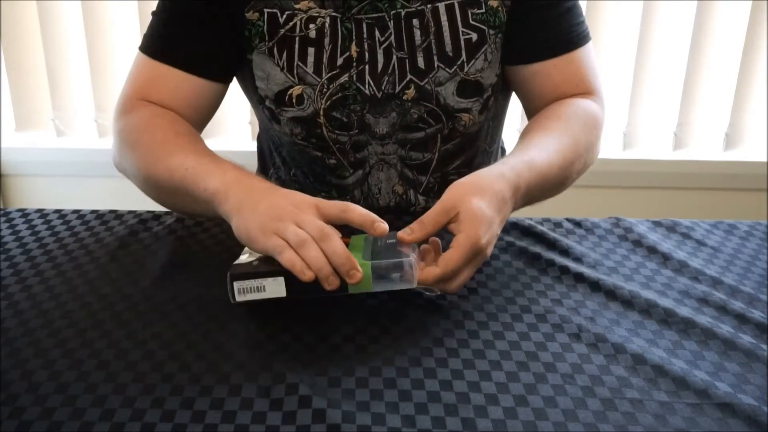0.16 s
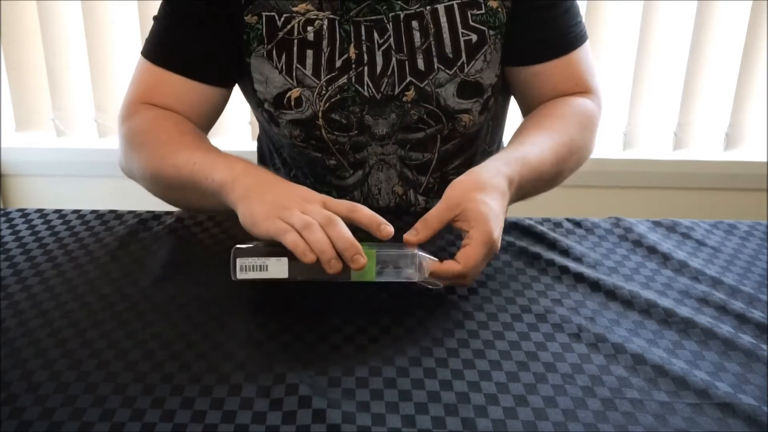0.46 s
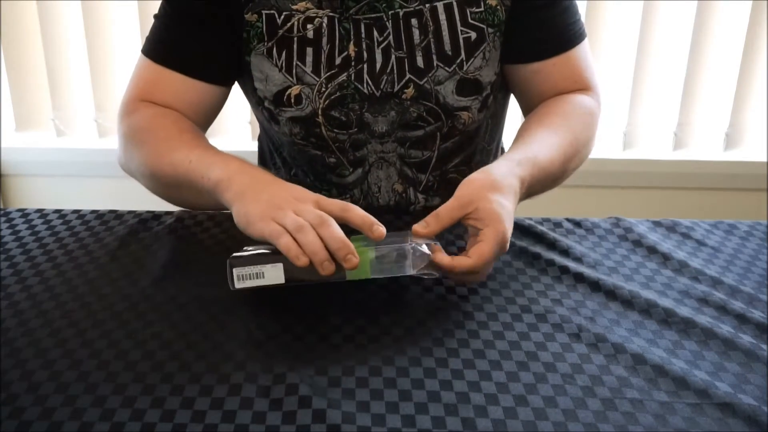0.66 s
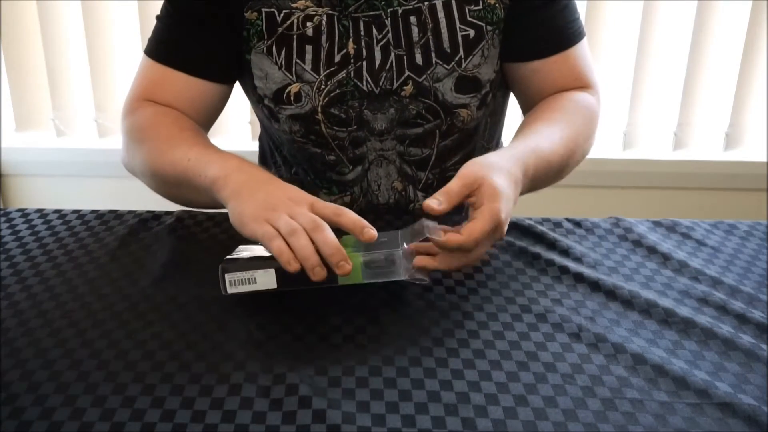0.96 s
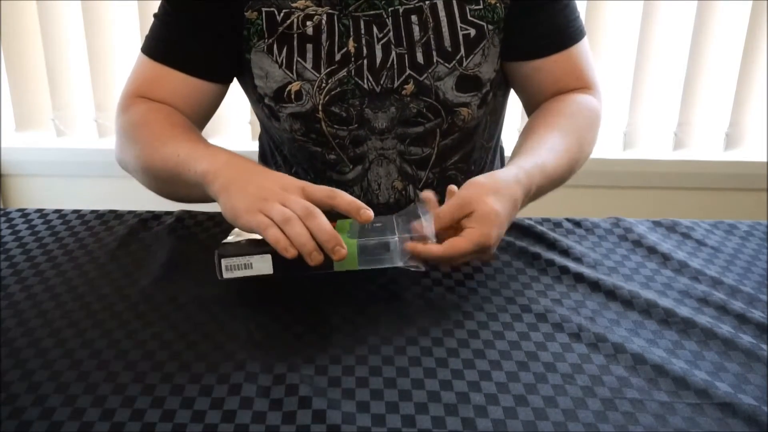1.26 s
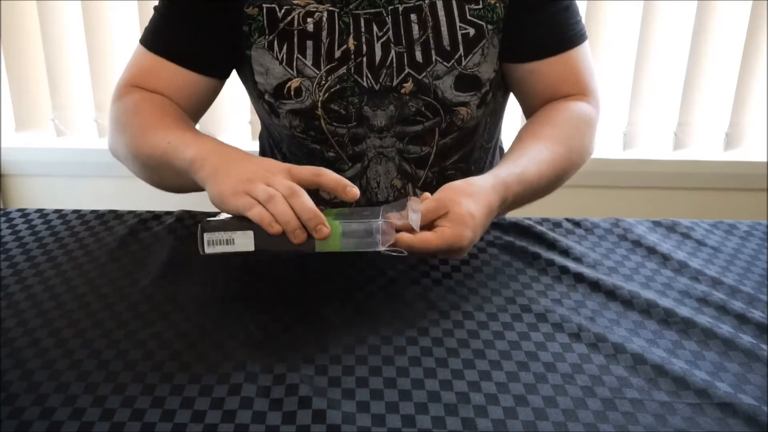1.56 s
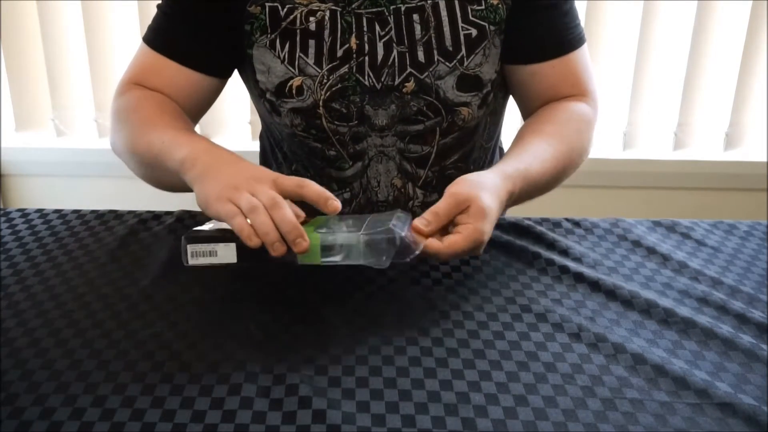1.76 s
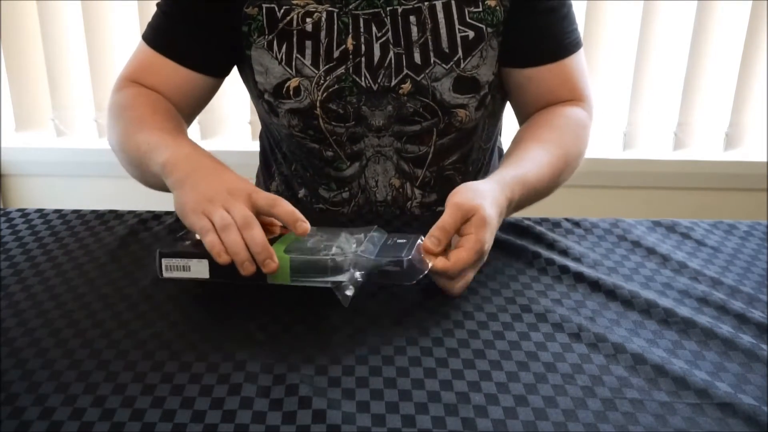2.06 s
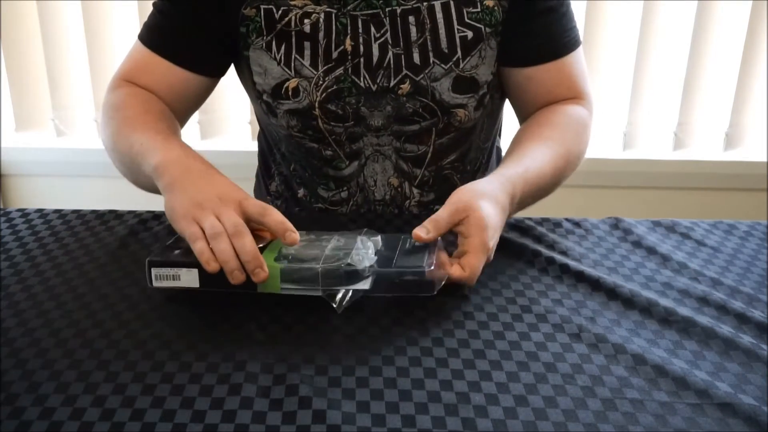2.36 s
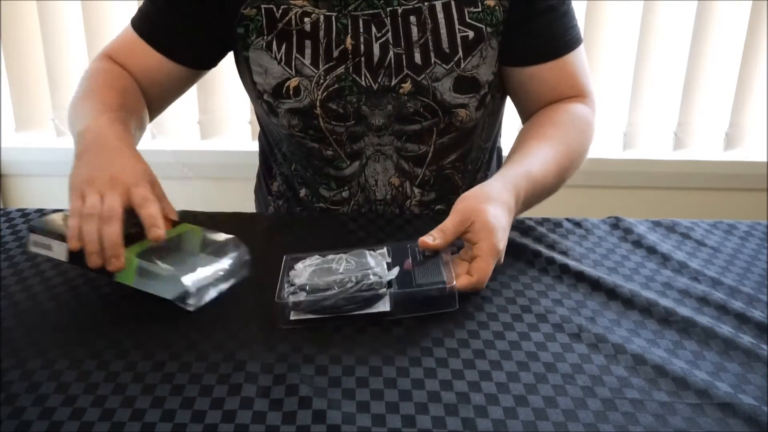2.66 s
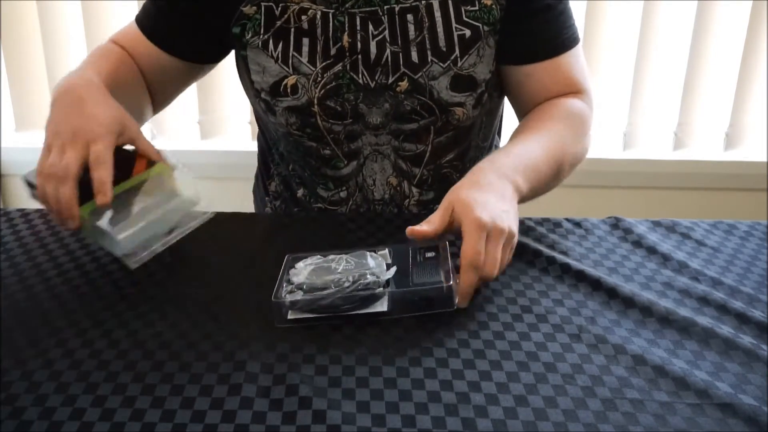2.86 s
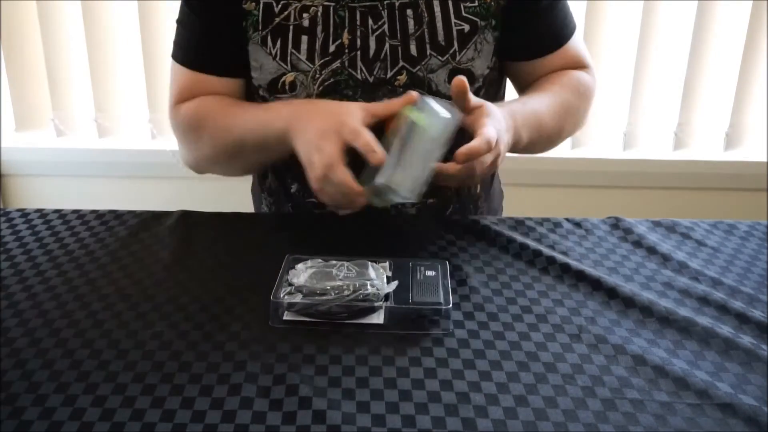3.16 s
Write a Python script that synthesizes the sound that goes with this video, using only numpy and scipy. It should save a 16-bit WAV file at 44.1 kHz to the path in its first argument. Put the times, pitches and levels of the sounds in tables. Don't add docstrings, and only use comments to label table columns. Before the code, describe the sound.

Stiff plastic and card packaging is opened close by: a loud hollow pop and brief rubbing at 0.1 s, crisp snaps around 0.4 and 0.6 s, sparser pops near 1.0, 1.2 to 1.5 and 1.6 s. A crackle cluster at 1.8 s leads to denser, fizzing scrapes at 2.05 to 2.4 and 2.6 to 2.95 s, then a dull cloth-muffled bump at 3.2 s. The lively room echoes over quiet hush.

```python
import sys
import numpy as np
from scipy import signal
from scipy.fft import rfft, irfft
from scipy.io import wavfile
from scipy.ndimage import uniform_filter1d

SR = 44100
rng = np.random.default_rng(int(sys.argv[2]) if len(sys.argv) > 2 else 0)


def master(y):
    cut = np.clip(np.atleast_2d(y).T, -1, 1)
    pcm = np.round(cut * 32767)
    wavfile.write(sys.argv[1], SR, pcm.astype(np.int16))


def natural_amplitude(level_db):
    exponent = np.asarray(level_db, float) / 20
    return 10 ** exponent


N = 145530


def evened(x):
    return x / np.sqrt(np.mean(x ** 2) + 1e-20)


def peaked(x):
    return x / (abs(x).max() + 1e-20)


def read(points, hz):
    f, value = np.transpose(points)
    return np.interp(np.log(hz + 1), np.log(f + 1), value)


def colour(x, points):
    gain = natural_amplitude(read(points, np.fft.rfftfreq(x.shape[-1], 1 / SR)))
    return irfft(rfft(x) * gain, x.shape[-1])


def thin(x, hz):
    return signal.sosfilt(signal.butter(2, hz, "high", fs=SR, output="sos"), x)


def ring(x, hz, width):
    b, a = signal.iirpeak(min(hz, 18000.), max(hz / width, .3), SR)
    return signal.lfilter(b, a, x)


def add(mix, s, sound):
    part = mix[round(s * SR):][:len(sound)]
    part += sound[:len(part)]


def burst(shape):
    x = rng.standard_normal(len(shape)) * shape
    for _ in range(6):
        z = rfft(x)
        x = irfft(z / (abs(z) + 1e-9), len(x))
        x = x * shape / np.sqrt(abs(uniform_filter1d(x ** 2, size=15)) + 1e-12)
    return x


def slips():
    slips_per_s, spread_db, slip_s = 750, 2.5, 0.0015
    chance, size, noise = rng.random((16384, 3)).T
    sizes = (chance < slips_per_s / SR) * natural_amplitude(-spread_db * np.log(size + 0.1))
    fading = signal.lfilter([1], [1, -np.exp(-1 / (slip_s * SR))], sizes)
    return (noise - .5) * (0.15 + fading)


def stroke(x, length, peak):
    u = np.linspace(0, 1, round(length * SR))
    return x[:len(u)] * np.sin(np.pi * u ** peak) ** 2


def pair(frames, size, gain):
    # (f/Hz, likeness from 0 to 1)
    likeness = [(100, 0.83), (500, 0.98), (1000, 0.72), (2000, 0.6), (4000, 0.013), (12000, 0.022)]
    hz = np.fft.rfftfreq(size, 1 / SR)[:, None]
    t = np.arange(frames) * size / 4 / SR
    a, b, c, d = rng.standard_normal((frames, len(hz), 4)).T
    same = np.clip(read(likeness, hz), 0, 1)
    mid = (a + 1j * b) * np.sqrt(1 + same)
    side = (c + 1j * d) * np.sqrt(1 - same)
    spectra = np.array([mid + side, mid - side]) * gain(hz, t)
    return signal.istft(spectra, nperseg=size, noverlap=size * 3 // 4)[1]


def hush():
    # (f/Hz, level/dB)
    hush_colour = [(25, -11), (60, -17.5), (200, -14), (1000, -11), (4000, -21.5), (16000, -27.5)]
    noise = pair(frames=N // 512 + 5, size=2048, gain=lambda hz, t: natural_amplitude(read(hush_colour, hz) + 0 * t))
    return natural_amplitude(-44) * evened(noise[:, :N])


def room(x):
    # (f/Hz, time/s)
    die_away = [(60, 0.13), (300, 0.53), (900, 0.61), (2500, 0.6), (6000, 0.47), (15000, 0.28)]
    # (f/Hz, level/dB)
    echo_colour = [(60, -74), (200, 11.5), (800, 6.5), (4000, 6), (15000, 4)]
    gap_s, rise_s = .003, .003
    out = np.zeros((2, N))
    turn = np.arange(N) / SR * 2 * np.pi * 1.31
    for k in range(3):
        tail = pair(frames=600, size=256,
                    gain=lambda hz, t: natural_amplitude(read(echo_colour, hz) - 60 * t / read(die_away, hz)))
        t = np.arange(tail.shape[1]) / SR
        tail = tail * np.clip((t - gap_s) / rise_s, 0, 1)
        fed = x * np.sqrt(2 / 3) * np.cos(turn + k * np.pi / 3)
        out += signal.fftconvolve(fed[None], tail / np.linalg.norm(tail[0]), axes=1)[:, :N]
    return natural_amplitude(3) * out


def knocks():
    # (t/s, level/dB, f/Hz)
    bumps = [(0.123, -44, 70), (0.616, -23, 380), (.64, -49, 50.4), (1.211, -36, 450), (1.31, -27.5, 211),
             (1.496, -29.5, 294), (1.813, -34.5, 188), (2.07, -28.5, 260), (2.476, -35.5, 108),
             (2.599, -35.5, 105), (2.659, -37.5, 118), (2.961, -34.5, 103), (2.964, -25.5, 353),
             (3.02, -38, 35.6), (3.214, -23, 420), (3.223, -28, 179), (3.253, -30, 420)]
    cycles = 2.37
    out, t = np.zeros(N), np.arange(8192) / SR
    for s, db, hz in bumps:
        u = t * hz / cycles
        push = u * np.exp(-5 * u) * np.sin(2 * np.pi * hz * t)
        add(out, s, natural_amplitude(db) * peaked(push))
    return out


def hums():
    # (start t/s, length/s, level/dB, f/Hz)
    singing = [(0.127, 0.13, -20.5, 1164), (0.131, 0.13, -25, 573), (.13, 0.18, -30.5, 2340),
               (0.426, 0.058, -35, 851), (0.626, 0.23, -40.5, 410), (.62, 0.081, -37, 2420),
               (.999, 0.049, -31, 2676), (1.0, 0.05, -30, 1900), (1.215, 0.081, -35, 548),
               (1.202, 0.036, -29, 1350), (1.499, 0.071, -34.5, 2150), (1.82, 0.12, -36, 540),
               (2.07, 0.36, -34, 942), (2.6, 0.34, -30.5, 843), (2.68, .16, -27, 1310),
               (2.702, 0.2, -34.5, 2840), (2.7, 0.113, -34.5, 485), (2.909, 0.017, -31, 2120),
               (2.962, 0.015, -26.5, 2030)]
    width = 0.084
    out = np.zeros(N)
    for s, length, db, hz in singing:
        tone = ring(ring(slips(), hz, width * hz), hz, 2 * width * hz)
        tone = natural_amplitude(db) * evened(tone[:round(length * SR)])
        add(out, s, stroke(tone, length, peak=.4))
    return out


def rub():
    # (start t/s, length/s, hollow level/dB, fizz level/dB, hollow f/Hz)
    strokes = [(0.015, 0.042, -36.5, -37, 850), (0.134, 0.097, -25.5, -32, 605),
               (0.133, 0.13, -21.5, -53, 744), (.42, 0.024, -35, -55, 890), (0.617, 0.21, -32, -25, 2470),
               (0.125, 0.12, -28.5, -45, 3900), (2.075, 0.25, -31, -37, 490),
               (1.297, 0.057, -29.5, -62, 422), (0.902, 0.044, -42, -41, 920),
               (1.308, 0.16, -41, -82, 1650), (1.603, 0.11, -38.5, -29, 880),
               (1.703, 0.15, -38.5, -29, 2260), (1.776, 0.07, -26, -24.5, 780),
               (1.782, 0.091, -28, -51, 2450), (2.064, 0.1, -24.5, -26, 1050),
               (2.064, 0.26, -31, -24, 2150), (2.092, 0.22, -24, -23, 3600), (2.402, 0.3, -39, -28.5, 546),
               (2.444, 0.34, -33, -28.5, 1510), (2.583, 0.11, -27.5, -21.5, 720),
               (2.66, 0.28, -28, -25, 1420), (2.685, 0.31, -32.5, -60, 760),
               (2.91, 0.019, -21.5, -23, 1530), (2.051, 0.013, -28, -53, 2460),
               (2.954, 0.03, -29, -31.5, 2080), (3.211, 0.052, -33.5, -60, 750)]
    # (f/Hz, level/dB)
    fizz_colour = [(500, -61), (1500, -49), (3000, 31.5), (6000, 29), (11000, 31.5), (16000, 31.5)]
    hollow_width, ring_width, ring_share = 0.82, 0.084, 0.39
    out = np.zeros(N)
    for s, length, hollow_db, fizz_db, hz in strokes:
        grains = slips()
        hollow = ring(ring(grains, hz, hollow_width * hz), hz, 2 * hollow_width * hz)
        hollow = evened(hollow) + ring_share * evened(ring(grains, hz, ring_width * hz))
        fizz = evened(colour(grains, fizz_colour))
        both = natural_amplitude(hollow_db) * evened(hollow) + natural_amplitude(fizz_db) * fizz
        add(out, s, stroke(both, length, peak=0.48))
    return out


def cracks():
    # (t/s, level/dB, f/Hz, build-up/s)
    creases = [(0.0262, -24.5, 4500, 0.00068), (0.1257, -9, 3230, 0.00077), (.165, -28, 4800, 0.00046),
               (0.179, -9, 13100, 0.0011), (0.2083, -7.5, 4260, 0.0012), (.362, -26, 9050, 0.00073),
               (0.416, -26, 8900, 0.00085), (0.422, -2.5, 10300, 0.00082), (0.564, -12.5, 10800, 0.00055),
               (.572, -19, 10600, 0.0015), (0.589, -20.5, 6200, 0.0034), (.614, -4.5, 5300, .0006),
               (.637, -9, 5100, .002), (0.6439, -0.5, 9700, 0.00089), (1.0046, -14, 7470, 0.0023),
               (1.239, -27, 5960, 0.00082), (1.302, -24, 5070, .001), (1.3068, -15, 10500, 0.00093),
               (1.3524, -18.5, 4550, 0.0022), (1.361, -21.5, 9450, 0.0012), (1.4128, -23, 10500, .0012),
               (1.599, -6.5, 12500, 0.0011), (1.608, -28, 11600, 0.0027), (1.7783, -13, 3530, 0.00041),
               (1.8014, -10, 5970, 0.002), (1.8198, -3.5, 3540, 0.00057), (1.8381, -4.5, 5530, 0.00089),
               (1.839, -3, 12000, 0.0011), (2.0572, -10, 8600, 0.00065), (2.065, -12, 13100, 0.00058),
               (2.107, -8, 10900, 0.0011), (2.1113, -6, 13000, .0006), (2.12, -3, 12200, 0.001),
               (2.133, -3, 12600, 0.00125), (2.146, -8, 13400, .001), (2.1599, -7.5, 3760, .0006),
               (2.3811, -7, 11100, 0.0008), (2.605, -11, 11500, 0.0016), (2.6403, -1.5, 13800, 0.0022),
               (2.6431, -6, 3360, 0.00097), (2.669, -10, 12500, .0012), (2.675, 1, 10400, 0.0002),
               (2.683, -17, 7100, 0.00033), (2.8537, -6.5, 5440, 0.00067), (2.855, -8.5, 3040, 0.00088),
               (2.9132, -13.5, 4940, 0.0014), (3.221, -31.5, 4790, 0.00098)]
    width, tail, spread_db = 0.56, 1.86, -5
    out, t = np.zeros(N), np.arange(1024) / SR
    for s, db, hz, build in creases:
        u = t / max(build, .0002)
        snap = burst(np.minimum(u, 1) * np.exp(-u / tail))
        bright = ring(ring(snap, hz, width * hz), hz, 2 * width * hz)
        wide = natural_amplitude(spread_db) * peaked(thin(snap, 3000))
        add(out, s, natural_amplitude(db) * peaked(wide + peaked(bright)))
    return out


def pops():
    # (t/s, level/dB, panel f/Hz, tick level/dB, shudder length/s)
    flips = [(0.0093, -12.5, 895, -16, 0.0007), (0.031, -25, 880, -15, 0.00071),
             (0.123, 1, 760, -21, 0.0021), (0.278, -16, 720, -13, 0.00092),
             (0.322, -23.5, 1060, 4, 0.00067), (0.361, -19.5, 1040, 2, 0.0014),
             (0.394, -17.5, 1060, -31, 0.0008), (0.42, -13, 920, 5, 0.0012),
             (.563, -19.5, 790, 3.5, 0.0025), (0.6151, -3.5, 904, 5, 0.0018), (0.961, -22, 790, -2, 0.0011),
             (0.9945, -8, 906, 0.5, 0.0014), (1.212, -13.5, 800, -5, 0.0031),
             (1.304, -12, 915, -18, 0.0039), (1.352, -17.5, 1580, -5, 0.0034),
             (1.416, -23, 1160, 9.5, 0.0011), (1.492, -8.5, 800, 1.5, 0.0018),
             (1.679, -19, 825, 2.5, 0.0014), (1.778, -13.5, 850, -10, 0.00067),
             (1.801, -13.5, 1050, 4.5, 0.0034), (1.8187, -10, 790, 2, 0.0031),
             (2.0606, -4.5, 870, 7.5, 0.0024), (2.383, -13, 670, 2, 0.00346), (2.475, -14, 654, -5, 0.0018),
             (2.634, -14.5, 810, 8.5, 0.0013), (2.684, -16.5, 1360, 10.5, 0.0024),
             (2.962, -15, 1070, 2, 0.0021), (3.213, -44, 475, -17, 0.0027)]
    # (pitch ratio, level/dB)
    panel = [(.62, -4), (0.999, 10), (1.351, 3.5)]
    # (f/Hz, level/dB)
    shell = [(1850, -6), (2650, -7), (3900, -14)]
    # (f/Hz, level/dB)
    tick_colour = [(300, -6), (1200, -1), (3000, -7), (6000, -16.5), (15000, -23)]
    ring_t60, tick_s = 0.0043, 0.00126
    out, t = np.zeros(N), np.arange(2048) / SR
    for s, db, hz, tick_db, shudder in flips:
        u = t / max(shudder, .0003)
        push = u * np.exp(-u)
        rings = [(ratio * hz, g) for ratio, g in panel] + shell
        ringing = np.zeros(len(t))
        for j, (f, g) in enumerate(rings):
            ringing += (-1) ** j * natural_amplitude(g - 60 * t / ring_t60) * np.sin(2 * np.pi * f * t)
        hollow = signal.fftconvolve(burst(push), ringing)[:len(t)]
        tick = colour(burst(np.exp(-t / tick_s) + push), tick_colour)
        add(out, s, natural_amplitude(db) * (peaked(hollow) + natural_amplitude(tick_db) * peaked(tick)))
    return thin(out, 321)


def scene():
    flips, snaps = pops(), cracks()
    pack = knocks() + rub() + hums()
    sent = pack + natural_amplitude(-2) * flips + natural_amplitude(-2.5) * snaps
    return pack + flips + snaps + room(sent) + hush()


def top_cut(x):
    return signal.sosfilt(signal.butter(12, 16950, fs=SR, output="sos"), x)


def record(dry):
    # (f/Hz, level/dB)
    balance = [(60, -0.5), (240, 0.5), (950, -0.5), (3770, 0), (15000, -3)]
    knee_db, squeeze, recover_db_per_s = -14, 0.48, 37
    sides = []
    for side, share in zip(dry, (.5, -.5)):
        sides.append(colour(thin(side, 37), [(f, share * g) for f, g in balance]))
    x = np.array(sides)
    power_db = 10 * np.log10(abs(uniform_filter1d((x ** 2).mean(0), 200)) + 1e-12)
    fall = np.arange(N) * recover_db_per_s / SR
    held_db = np.maximum.accumulate(power_db + fall) - fall
    over_db = np.maximum(held_db - knee_db, 0)
    smooth_db = signal.lfilter([1 / 130], [1, 1 / 130 - 1], over_db)
    x = np.clip(x / natural_amplitude(squeeze * smooth_db), -.9, .9)
    treble_cut = signal.firwin(511, 15800, window="blackman", fs=SR)
    return top_cut(signal.oaconvolve(x, treble_cut[None], "same"))


dry = scene()
out = record(dry)
master(out)
```